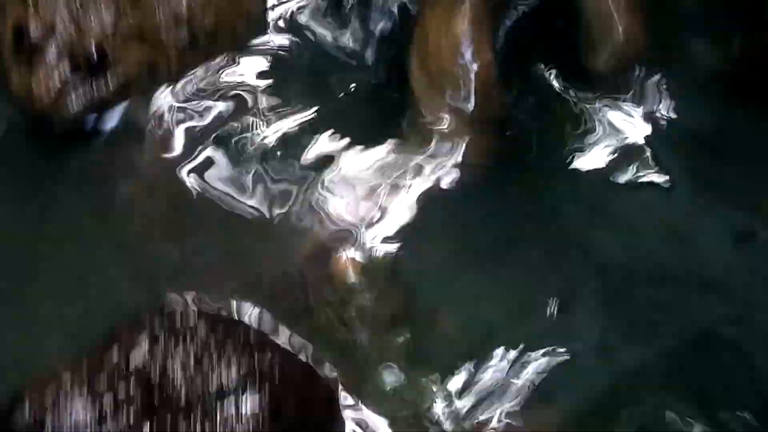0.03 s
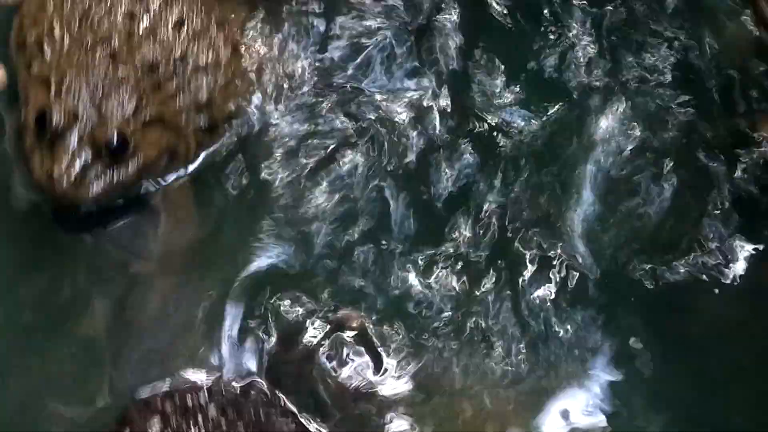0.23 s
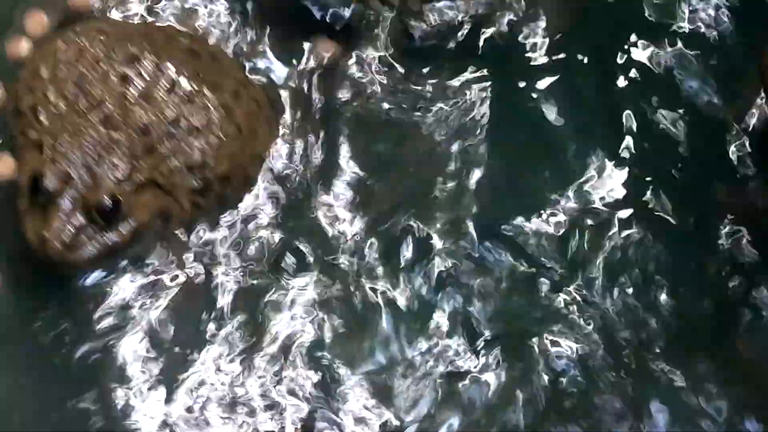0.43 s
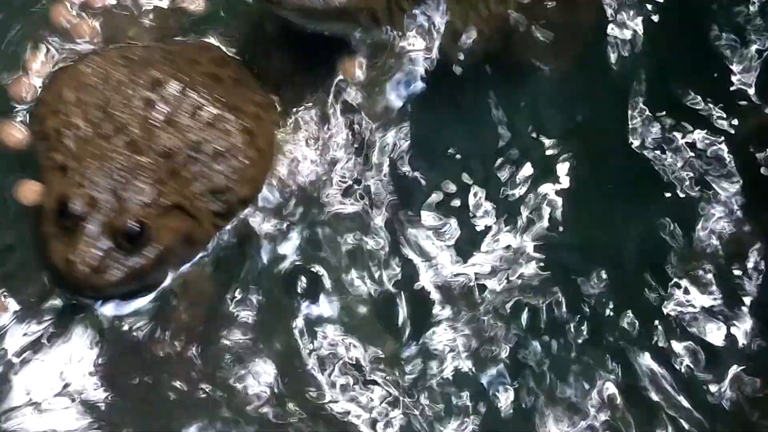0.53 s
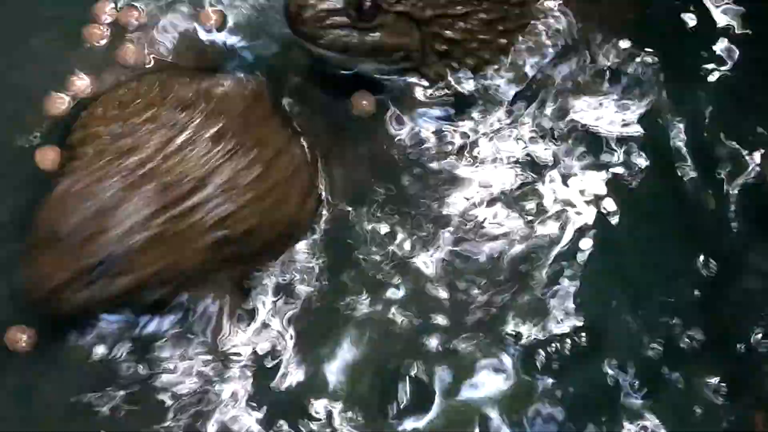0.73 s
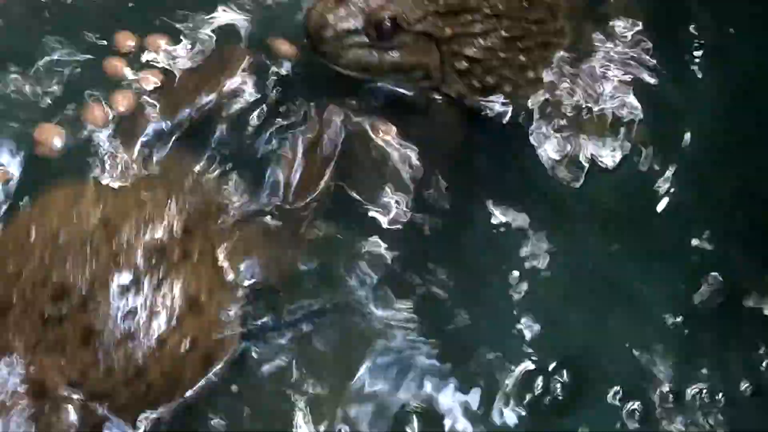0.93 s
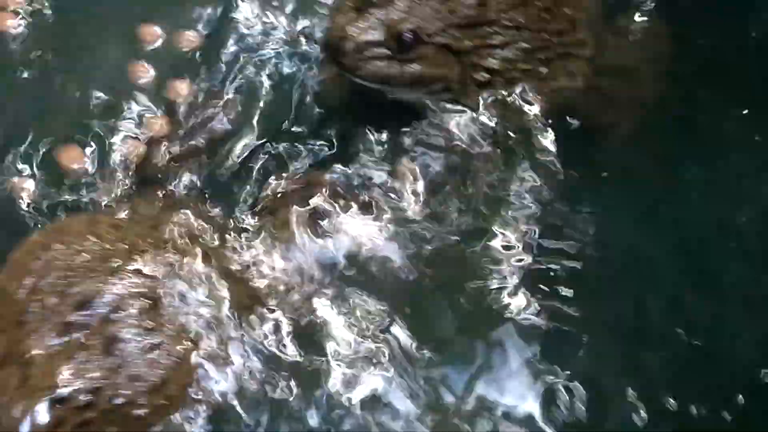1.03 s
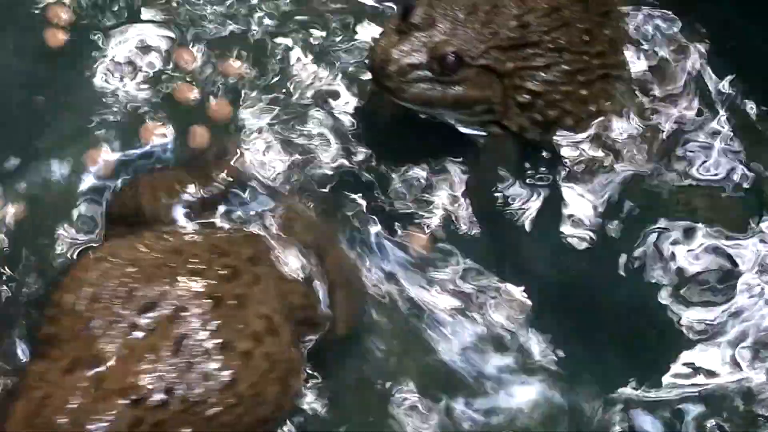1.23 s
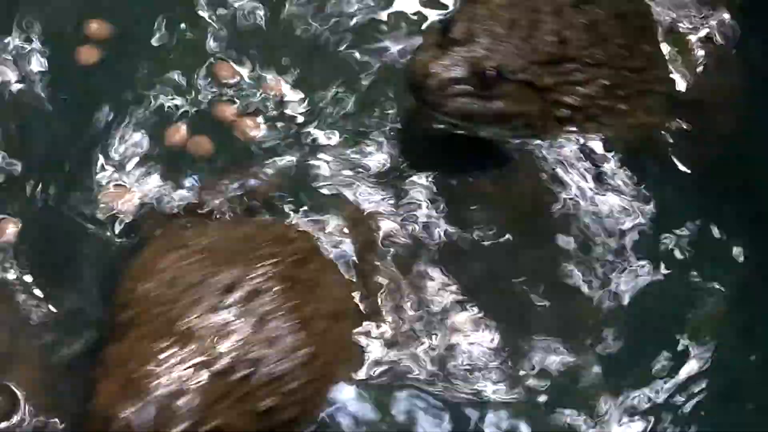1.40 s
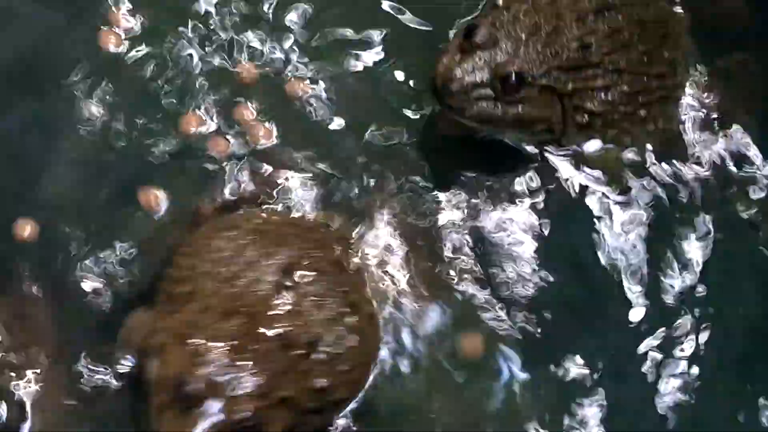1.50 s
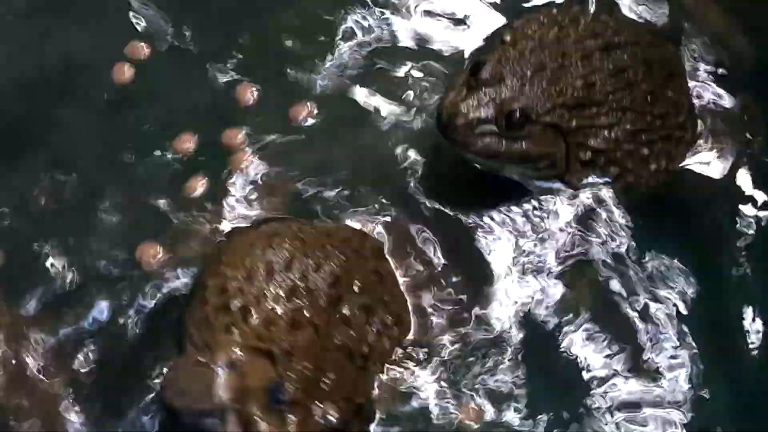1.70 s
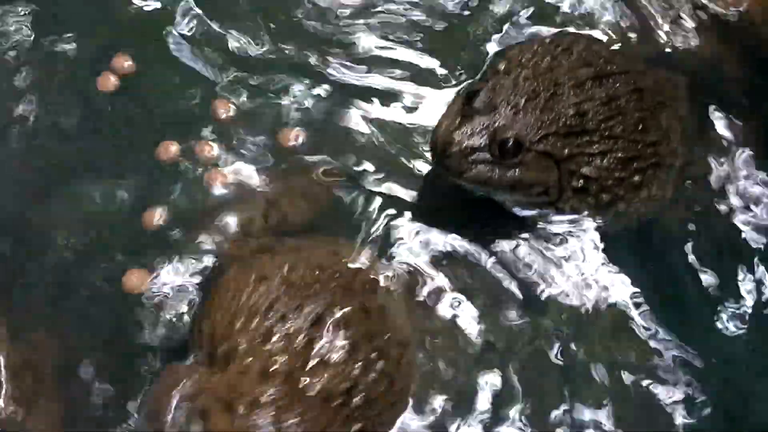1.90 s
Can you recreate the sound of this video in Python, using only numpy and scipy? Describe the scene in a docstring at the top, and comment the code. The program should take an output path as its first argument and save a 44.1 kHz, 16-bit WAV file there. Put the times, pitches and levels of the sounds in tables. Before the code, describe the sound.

Short watery splashes and plops as frogs lunge about in a shallow tank.

```python
"""Frogs lunge about in the shallow water of a tank, close by.
Each kick traps air pockets that ring as plops and gurgles, churns up small bubbles and throws a bright spray;
droplets tick, wet bodies pat the surface, and the tank walls answer briefly over a faint steady hiss."""
import sys
import numpy as np
from scipy import signal
from scipy.fft import rfft, irfft
from scipy.io import wavfile

SR = 44100
rng = np.random.default_rng(int(sys.argv[2]) if len(sys.argv) > 2 else 0)


def store_pcm(level_fs):
    """Save levels as 16-bit WAV."""
    pcm = np.round(np.clip(level_fs, -1, 1) * 32767).astype(np.int16)
    wavfile.write(sys.argv[1], SR, np.atleast_2d(pcm).T)


N = 85995

# air pockets pinched off at once: (s, pitch Hz, peak dB, decay s)
PLOPS = [(0.1894, 5300, -36, .003), (0.1958, 1660, -9.5, 0.0011), (0.1985, 1170, -13.5, 0.0027), (0.202, 3330, -30.5, 0.0024), (0.202, 1560, -18, 0.0028), (0.205, 7000, -41, 0.0056),
         (.2045, 803, -17.5, 0.0031), (0.2274, 1560, -21, 0.0037), (0.24, 2830, -34, .003), (.2612, 2160, -26, 0.0026), (0.2674, 1236, -27.5, 0.0039),
         (.2725, 2017, -24, 0.0045), (0.2698, 2690, -31.5, 0.0043), (.2812, 2026, -21.5, 0.0036), (.3240, 2010, -34, 0.0038),
         (.3745, 4720, -42, .004), (.3795, 5020, -40.5, .005), (0.392, 1870, -34.5, 0.0052), (0.3975, 3850, -32, 0.0013), (0.397, 7000, -34, 0.0027), (0.399, 1790, -31, 0.0032), (0.4058, 834, -24.5, 0.0022),
         (0.4051, 1954, -28.5, 0.0039), (0.4063, 3660, -30, 0.0011), (0.419, 2780, -35, 0.0054), (.4275, 680, -36.5, 0.0038), (0.5, 1760, -46.5, 0.0084),
         (.9185, 1264, -35.5, 0.0029), (0.9438, 2300, -28, 0.0021), (0.943, 1270, -39, .002), (0.955, 1460, -37.5, 0.0033),
         (1.001, 2250, -44.5, 0.004), (1.4872, 1670, -41, 0.0071), (1.4905, 2186, -35, 0.0031), (1.526, 4150, -40.5, 0.0053), (1.574, 5950, -37, .007),
         (1.602, 2420, -34.5, 0.0037), (1.6016, 1770, -41, 0.0038), (1.6150, 1620, -44, .006), (1.6445, 1857, -29, 0.0051), (1.6424, 2800, -32.5, 0.0061), (1.6465, 2130, -29, 0.0032),
         (1.6563, 1091, -35, 0.005), (1.6611, 1820, -30, 0.0031), (1.784, 2130, -44, .004)]
# air pockets that swell and glide in pitch as they move: (s of the peak, pitch Hz, peak dB, swell s, decay s, climb octaves per s)
GURGLES = [(.164, 4600, -50, .003, 0.0078, -21), (.233, 4460, -40, .003, .008, -14), (0.265, 994, -29.5, 0.0056, 0.01, 8), (.284, 1548, -29.5, 0.0072, 0.0052, 19.5), (.326, 1520, -41.5, .006, .006, -2),
           (0.335, 3100, -43, 0.011, 0.0061, 32), (.345, 1304, -45.5, 0.0046, 0.0074, 23), (.419, 924, -29.5, 0.0048, 0.0098, 20.5),
           (.437, 1930, -27.5, 0.0028, 0.0076, 10.5), (0.97, 1262, -51, 0.0036, 0.013, -17), (1.022, 1175, -51.5, 0.015, 0.009, 32),
           (1.518, 2140, -46, 0.0098, 0.0047, 10.5), (1.636, 2720, -41, 0.0036, 0.0061, 10), (1.672, 2800, -43, 0.0023, 0.0052, -12)]
PINCH_S, PLOP_CLIMB_OCT_PER_S, BUBBLE_LOW_HZ = 0.00035, 2.3, 626
# sheets of spray: (s of the peak, level dB, swell s, decay s, tilt dB per octave)
SPRAYS = [(0.184, -33.5, .001, 0.003, 7), (0.19, -37.5, 0.00086, 0.009, -8), (0.206, -35, 0.007, 0.0091, -6.5), (0.228, -39, 0.0086, 0.018, -7.5),
          (0.2502, -16.5, 0.00096, 0.0069, 5.5), (.263, -32.5, 0.01, 0.035, -3.5), (.335, -50, 0.0057, 0.015, -8),
          (.386, -37.5, 0.0087, 0.015, -3.5), (0.4, -39, 0.001, 0.016, -7), (0.408, -33.5, .001, 0.0056, 0.5), (0.43, -40.5, 0.0086, 0.021, -4.5),
          (0.849, -47.5, 0.0046, 0.0074, -4), (0.92, -44, 0.0011, 0.0086, 1.5), (0.943, -40, 0.00046, 0.002, -12),
          (1.489, -38, 0.00079, 0.012, -4.5), (1.518, -39, 0.001, 0.0088, -3), (1.529, -32.5, .0004, 0.011, 0.5), (1.567, -37, 0.0011, 0.0066, -3.5),
          (1.575, -31.5, 0.0033, 0.013, -0.5), (1.628, -45, 0.015, 0.026, -4.5), (1.656, -40, 0.0053, 0.013, -6.5), (1.865, -52.5, 0.02, 0.01, -13.5), (1.889, -48, 0.00087, 0.025, -7)]
SPRAY_COLOUR = [(150, -28), (1000, -24.5), (2500, -5.5), (4500, -8), (6000, -8), (7300, -2), (8500, -2.5), (9300, -8.5), (11500, -0.5), (12800, -2), (15000, 5), (16000, 13)]  # (Hz, dB per Hz)
SPRAY_GRAINS_PER_S, GRAIN_SPREAD_DB = 12000, 2
# churned water full of small bubbles: (s of the peak, level dB, swell s, decay s, commonest pitch Hz)
CHURNS = [(0.164, -52, 0.0067, 0.02, 2230), (0.203, -34.5, 0.0036, 0.018, 1790), (0.268, -32.5, 0.0063, 0.021, 1920), (0.409, -39.5, 0.0038, 0.017, 2180), (0.43, -38, 0.0024, 0.012, 2180),
          (.851, -46.5, 0.0037, 0.0081, 1900), (0.955, -47.5, 0.0075, 0.014, 2020), (1.496, -51.5, .003, 0.046, 2180), (1.574, -47.5, 0.0097, 0.018, 1900), (1.617, -41.5, 0.0044, 0.011, 1710),
          (1.646, -38, .001, 0.0087, 3050), (1.658, -45, 0.0031, 0.018, 2320)]
CHURN_BUBBLES_PER_S, CHURN_CYCLES = 3500, 18.4
# droplets landing: (s, peak dB, pitch Hz, decay s)
DROPS = [(0.1375, -38, 14500, .0003), (.158, -36, 13000, 0.00017), (0.481, -42, 7050, 0.0011), (0.5677, -33.5, 8150, 0.00057), (0.6353, -36.5, 8360, 0.00047), (0.8106, -35, 8500, 0.00056), (0.929, -39.5, 10800, .0004),
         (1.0092, -35.5, 14700, 0.0017), (1.299, -37, 14400, .0005), (1.3, -35.5, 11200, 0.00035), (1.5294, -30, 8450, 0.00072), (1.698, -30, 14700, 0.0006), (1.698, -35, 12200, 0.00065),
         (1.8888, -32.5, 6830, 0.00044)]
DROP_WET_DB = 2
SPATTER_DB, SPATTER_S = -14.5, 0.0027  # fine spatter thrown up by each drop
STRAY_DROPS_PER_S, STRAY_DB = 79, -53.5
# bodies patting the surface: (s, level dB, pitch Hz)
PATS = [(.1965, -41.5, 570), (0.204, -42, 160), (0.2659, -38.5, 453), (0.275, -42.5, 191), (0.409, -44.5, 203), (0.431, -45.5, 200), (0.92, -42, 274), (0.944, -39.5, 383), (0.955, -44.5, 450), (1.510, -47, 550)]
PAT_ROUGH, PAT_DECAY_S = 0.55, 0.0035
HISS = [(15, -13.5), (27, 2.5), (62, -3), (110, -7.5), (220, -15), (300, -9), (380, -18), (700, -16), (860, -10.5), (1050, -15.5), (2200, -13.5), (4100, -20.5), (5100, -19), (5600, -28.5), (7900, -21), (9300, -30.5), (13000, -26), (15200, -17), (16000, -20)]  # (Hz, dB per Hz)
HISS_DB = -54.5
HISS_TREBLE = [(0, -2), (.5, 2.5), (.8, 1), (1.2, -0.5), (1.45, 4.5), (1.95, 3.5)]
TANK_T60_S, TANK_FIRST_ECHO_S, SPRAY_WET_DB = 0.095, 0.0014, -10
BUBBLE_WET_DB = -19  # fixed
CUTOFF_HZ = 15700  # fixed
TIME = np.arange(N) / SR
PLINKS_PER_S, PLINK_DB = 220, -66.5  # stray bubbles in the stirred water
WAVER_HZ, WAVER_OCT, WAVER_DB = 160, 0.02, 2  # a rising air pocket wobbles in pitch and level
CHURN_LOW_HZ, CHURN_HIGH_HZ, CHURN_FALL_DB_PER_OCT = 615.5, 3913, 9.5  # range of the bubbles; they weaken away from the commonest pitch
FIZZ_PER_S, FIZZ_CYCLES = 1200, 24  # fixed
FIZZ_DB = -3  # tiny ringing bubbles in the spray, against its sizzle


def from_db(db):
    """Decibels to gain."""
    return 10 ** (np.asarray(db) / 20)


def rms_one(x):
    """Scale to rms 1."""
    return x / np.sqrt(np.mean(x ** 2) + 1e-20)


def at_hz(points, hz):
    """Read a spectrum on a log-frequency axis."""
    f, db = np.transpose(points)
    return np.interp(np.log(hz), np.log(f), db)


def coloured(x, points, tilt_db=0):
    """Give x a spectrum, tilted per octave above 1 kHz; rms 1."""
    hz = np.maximum(np.arange(N // 2 + 1) * SR / N, 1)
    octaves = np.log2(np.maximum(hz / 1000, 1))  # fixed
    return rms_one(irfft(rfft(x) * from_db(at_hz(points, hz) + tilt_db * octaves) * (hz < CUTOFF_HZ), N))


def swell(peak_s, swell_s, decay_s):
    """Exponential rise to a peak and exponential fall."""
    t = TIME - peak_s
    return np.exp(np.maximum(np.where(t < 0, t / swell_s, -t / decay_s), -50))  # fixed


def grains(per_s):
    """Random clicks of uneven size and sign."""
    sizes = from_db(GRAIN_SPREAD_DB * np.minimum(rng.exponential(1, N), 4)) * rng.choice([-1, 1], N)
    return sizes * (rng.random(N) < per_s / SR)


def chirp(s, hz, climb):
    """A sine that passes hz at time s, climbing in octaves per second."""
    t = TIME - s
    phase = np.cumsum(hz * 2 ** (climb * np.clip(t, -.02, .02))) / SR  # fixed
    return np.sin(2 * np.pi * (phase - np.interp(s, TIME, phase)))


def ring(clicks, hz, decay_s):
    """A unit click sets a sine of height 1 ringing."""
    r, w = np.exp(-1 / (decay_s * SR)), 2 * np.pi * hz / SR
    return signal.lfilter([0, np.sin(w)], [1, -2 * r * np.cos(w), r * r], clicks + 1e-18)


def tank(x, wet_db):
    """Add the dense, quickly dying echoes of the tank walls."""
    t = TIME[:N // 4]
    echoes = rng.standard_normal(len(t)) * np.exp(-np.log(1000) * t / TANK_T60_S) * (t > TANK_FIRST_ECHO_S)
    return x + from_db(wet_db) * signal.fftconvolve(x, echoes / np.linalg.norm(echoes))[:N]


def air_pockets():
    """Large bubbles: plops start at once, gurgles swell, glide and wobble."""
    out = np.zeros(N)
    for s, hz, db, decay_s in PLOPS:
        out += from_db(db) * swell(s + PINCH_S, PINCH_S / 2, decay_s) * chirp(s, hz, PLOP_CLIMB_OCT_PER_S)
    for s, hz, db, swell_s, decay_s, climb in GURGLES:
        out += from_db(db + WAVER_DB * wobble()) * swell(s, swell_s, decay_s) * chirp(s, hz * 2 ** (WAVER_OCT * wobble()), climb)
    return signal.sosfilt(signal.butter(3, BUBBLE_LOW_HZ, "high", fs=SR, output="sos"), out)


def churn():
    """Dense swarms of bubbles follow each kick, each around a pitch of its own; faint ones keep plinking once the water is stirred."""
    bubbles = swarm(CHURN_BUBBLES_PER_S, CHURN_LOW_HZ, CHURN_HIGH_HZ, CHURN_CYCLES)
    out = from_db(PLINK_DB) * swarm(PLINKS_PER_S, 1207, 3150, cycles=91) * (TIME > CHURNS[0][0])
    for s, db, swell_s, decay_s, hz in CHURNS:
        colour = [(hz * 2.0 ** octave, -CHURN_FALL_DB_PER_OCT * abs(octave)) for octave in (-2, 0, 2)]
        out += from_db(db) * swell(s, swell_s, decay_s) * coloured(np.roll(bubbles, rng.integers(N)), colour)
    return out


def spray():
    """Bright sizzle of countless tiny drops and ringing bubbles as the surface tears."""
    fizz = rms_one(np.diff(swarm(FIZZ_PER_S, 3462, 15320, FIZZ_CYCLES), prepend=0))
    sizzle = rms_one(grains(SPRAY_GRAINS_PER_S)) + from_db(FIZZ_DB) * fizz
    return sum(from_db(db) * swell(s, up, down) * coloured(np.roll(sizzle, rng.integers(N)), SPRAY_COLOUR, tilt) for s, db, up, down, tilt in SPRAYS)


def droplets(count=12):
    """Single drops tick with a short high ring and a fine spatter; fainter ones fall at random."""
    out = sum(from_db(db) * ring(np.arange(N) == int(s * SR), hz, decay_s) for s, db, hz, decay_s in DROPS)
    spatter = sum(from_db(db + SPATTER_DB) * swell(s, PINCH_S, SPATTER_S) for s, db, *_ in DROPS)
    out += spatter * coloured(grains(SPRAY_GRAINS_PER_S), SPRAY_COLOUR, tilt_db=10)
    clicks, dealt = grains(STRAY_DROPS_PER_S), rng.integers(0, count, N)
    for k, hz in enumerate(np.geomspace(6500, 15000, count)):
        out += from_db(STRAY_DB) * ring(clicks * (dealt == k), hz, decay_s=0.00029)
    return out


def pats():
    """Dull short pushes of a body on the water: a few cycles of a low, rough tone."""
    rough = coloured(rng.standard_normal(N), [(100, -12.5), (400, -18.5), (2000, -50)])
    return (1 + PAT_ROUGH * rough) * sum(from_db(db) * swell(s + PINCH_S, 2 * PINCH_S, PAT_DECAY_S) * chirp(s, hz, 0) for s, db, hz in PATS)


def background():
    """Steady hiss over a faint rumble."""
    noise = coloured(rng.standard_normal(N), HISS)
    treble = signal.sosfiltfilt(signal.butter(2, 5000, "high", fs=SR, output="sos"), noise)  # fixed
    return from_db(HISS_DB) * (noise + treble * (from_db(np.interp(TIME, *np.transpose(HISS_TREBLE))) - 1))


def swarm(per_s, low_hz, high_hz, cycles, count=28):
    """Small bubbles born at random, spread evenly in pitch, each ringing for some cycles; rms 1."""
    clicks, dealt = grains(per_s), rng.integers(0, count, N)
    return rms_one(sum(ring(clicks * (dealt == k), hz, cycles / (np.pi * hz)) for k, hz in enumerate(np.geomspace(low_hz, high_hz, count))))


def wobble():
    """A smooth random wobble; spread 1."""
    return rms_one(signal.sosfilt(signal.butter(2, WAVER_HZ, fs=SR, output="sos"), rng.standard_normal(N)))


def scene():
    """All the water sounds in the tank, over the background."""
    water = tank(air_pockets() + churn() + pats(), BUBBLE_WET_DB) + tank(spray(), SPRAY_WET_DB) + tank(droplets(), DROP_WET_DB)
    return (water + background())[None]


def record(dry):
    """The top is cut steeply."""
    return signal.sosfilt(signal.ellip(10, .1, 70, CUTOFF_HZ, fs=SR, output="sos"), dry)


dry = scene()
out = record(dry)
store_pcm(out)
```